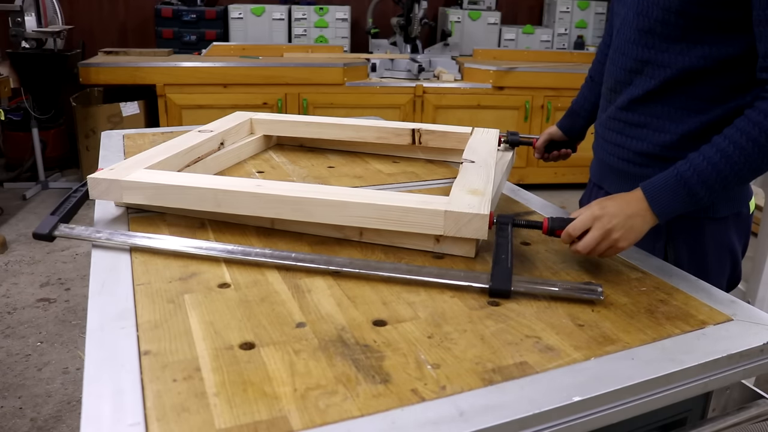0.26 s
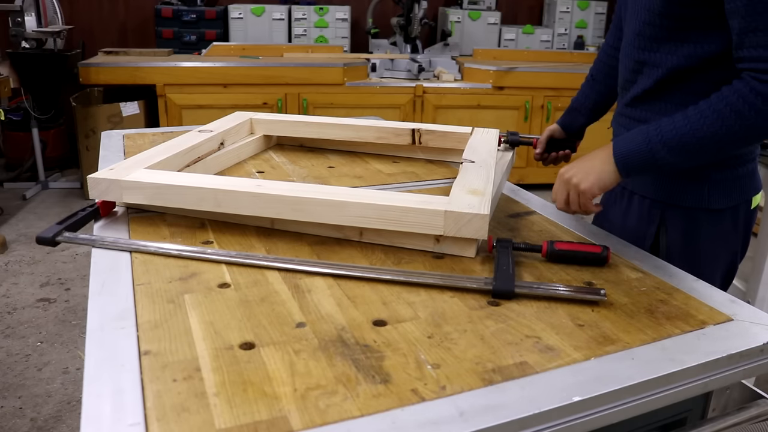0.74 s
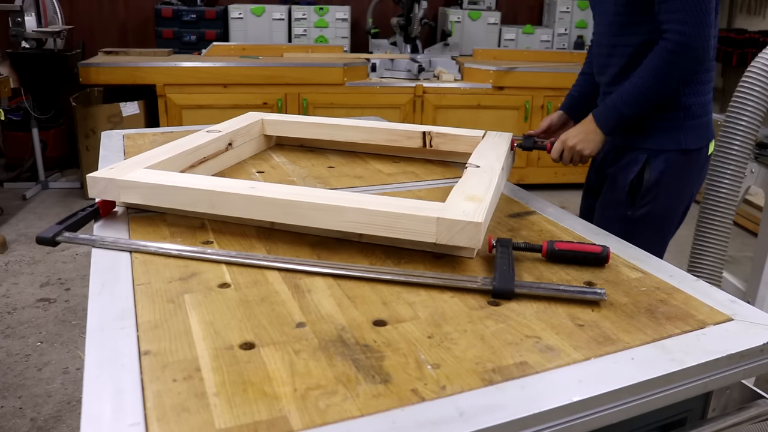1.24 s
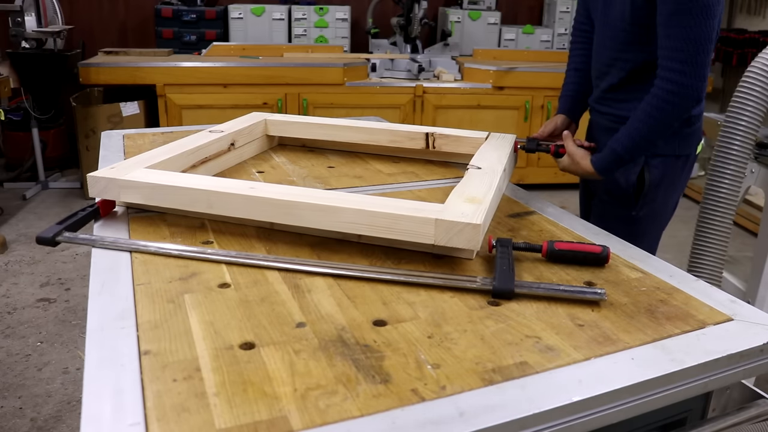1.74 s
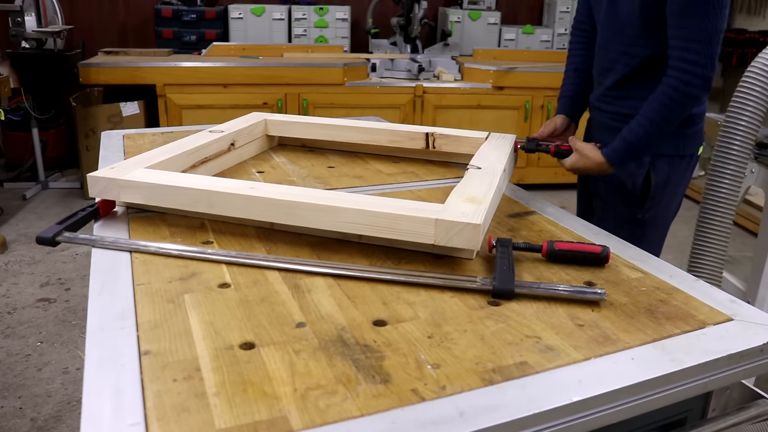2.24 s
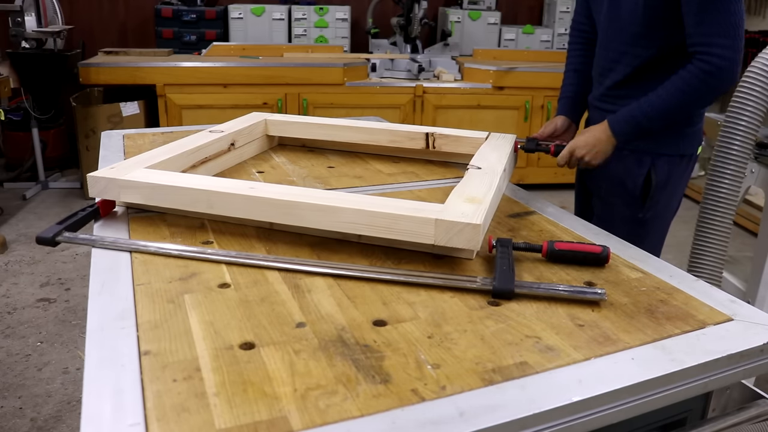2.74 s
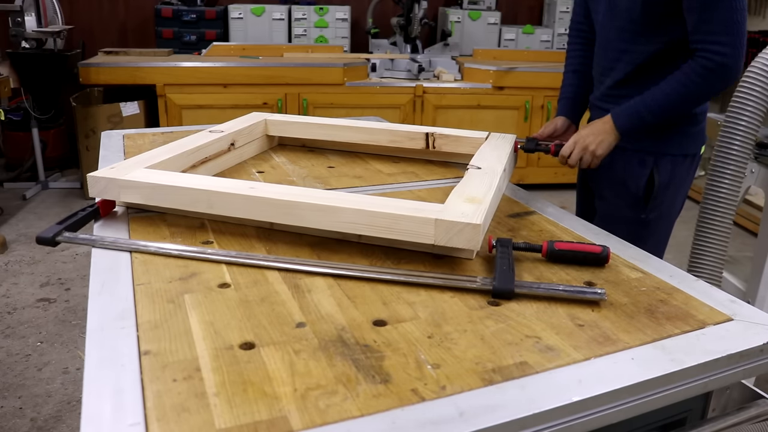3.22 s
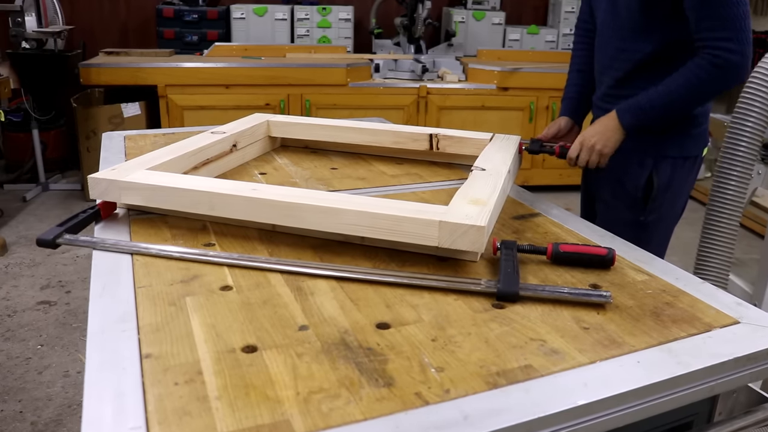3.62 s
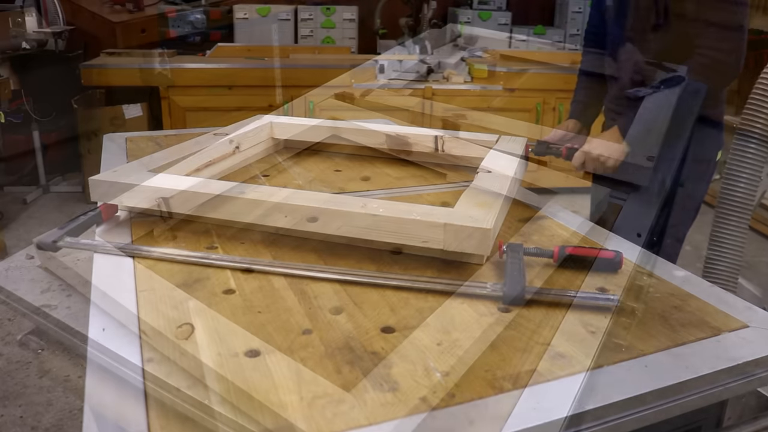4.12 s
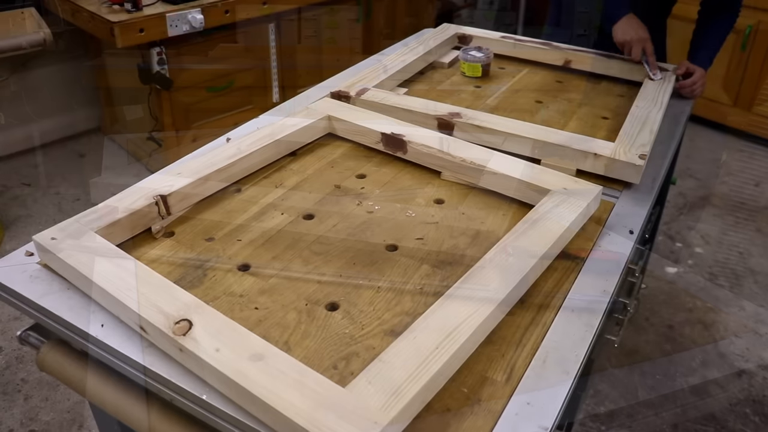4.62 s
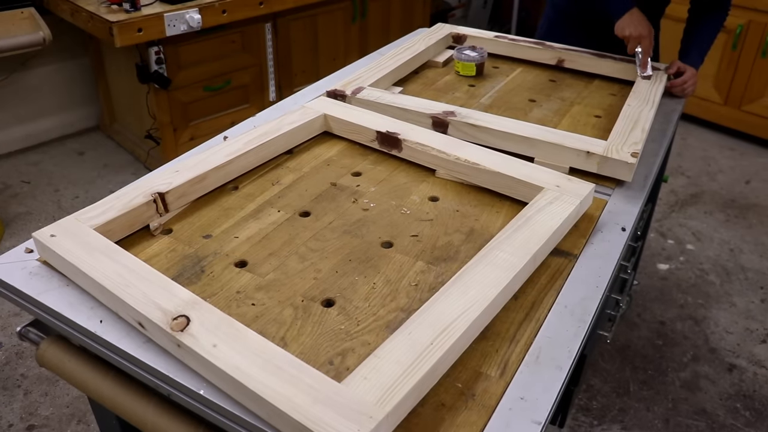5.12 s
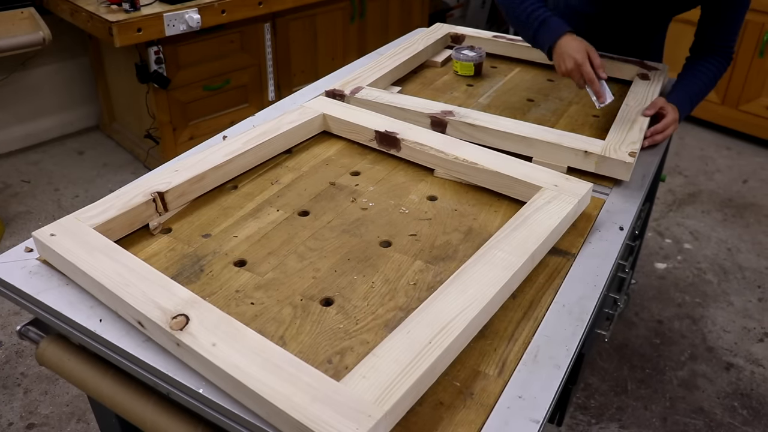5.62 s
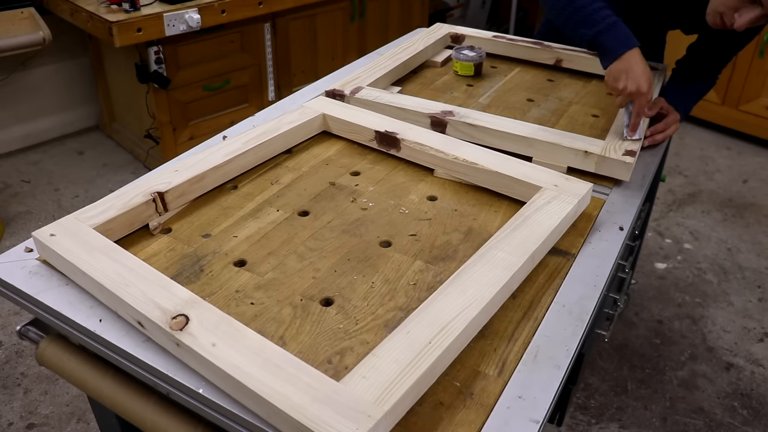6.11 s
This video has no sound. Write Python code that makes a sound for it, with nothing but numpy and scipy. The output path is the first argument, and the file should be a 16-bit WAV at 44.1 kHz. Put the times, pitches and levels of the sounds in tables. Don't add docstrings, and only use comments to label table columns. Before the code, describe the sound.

In a small workshop a steel clamp bar drops hard on a wooden bench, ringing brightly, turning over, scraping and being set down. Handle grips and soft thumps follow, then six wooden knocks about every 0.4 seconds, weakening at the end. The scene fades to faint rag wipes and fingertip taps on another frame. Close small microphone, low motor hum, overloaded on the first blow.

```python
import sys
import numpy as np
from scipy import signal
from scipy.fft import rfft, irfft
from scipy.io import wavfile

SR = 44100
rng = np.random.default_rng(int(sys.argv[2]) if len(sys.argv) > 2 else 0)


def digitize_waveform(pressure):
    field = np.atleast_2d(pressure).T
    bounded = np.clip(field, -1, 1)
    quanta = np.round(bounded * 32767).astype(np.int16)
    wavfile.write(sys.argv[1], SR, quanta)


def level_to_linear(level):
    exponent = np.asarray(level, float) / 20
    return 10 ** exponent


N = 280476

# [t/s, wood/dB, steel/dB, gain dip/dB, recovery/s]
BLOWS = [
    (0.3813, 10, 3, 30.5, 0.13),
    (0.662, -6, -11.5, 11, 0.53),
    (1.3147, -5, -30.5, 19, 0.062),
]
# [t/s, peak/dB, hardness/dB]
CLACKS = [
    (2.5024, -16, 4.5),
    (2.9426, -16, 4.5),
    (3.3762, -13, 2.5),
    (3.786, -18.5, 1.5),
    (4.203, -21, 4),
    (4.578, -27, 1.5),
]
# [t/s, peak/dB, hardness/dB]
TAPS = [
    (5.3012, -32, 3),
    (5.734, -48, -3),
    (5.838, -33.5, 1),
    (6.0428, -34.5, 12),
    (6.0492, -33, 13),
    (6.086, -30, -15),
    (6.2396, -33, 2),
]
# [f/Hz, width/Hz, level/dB]
BENCH = [(230.6, 26, -13), (378, 52, -11), (550, 67, -9.5), (802, 69, -12), (1129, 100, 6.5),
         (1352, 42, -2.5), (1545, 110, 11), (1674, 141, 14), (2193, 59, -0.5), (2510, 50, -5.5)]
# [f/Hz, level/dB, 60 dB decay/s]
FRAME = [(193.4, -1, 0.5), (214, 5, 0.24), (274, -19.5, 0.12), (283.6, -2.5, 0.485), (310, -1, 0.19),
         (362, -9.5, 0.28), (398.5, 0, 0.36), (451, -2.5, 0.37), (503, -5, 0.47), (624, -3.5, 0.22),
         (643.5, -2.5, 0.6), (737, 0, 0.34), (781, 5, 0.12), (856, -6.5, 0.2), (1004, -7.5, 0.22),
         (1154, -11, 0.56), (1247, -7.5, 0.15), (1310, -20, 0.088), (1497, -29.5, 0.13), (1650, -6, 0.49),
         (2120, -17, .15), (1613, -21.5, 0.72), (1785, -12.5, 0.16), (1863, 1.5, 0.14), (2280, -22.5, 0.17),
         (2520, -20, 0.12)]
BAR_HZ = [2575, 3553, 3806, 4705, 5076, 5276, 5566, 5631, 5945, 6435, 6760, 7700, 7763, 8815, 9728, 9851,
          9940, 10330, 10620, 11550, 12320, 12930, 14400, 14900, 3220, 4120, 7230, 8450, 9020, 9440, 11150,
          13300, 13700, 15600]
# [level at first blow/dB, level at later blows/dB, 60 dB decay/s]
BAR_RING = [(3.5, 3, 0.36), (-24, -13.5, .5), (-8, -21, .6), (-12, 0, 0.74), (-15.5, -20.5, 0.48),
            (-7, -23, 0.6), (-16.5, -19, .7), (-9, -18.5, 0.33), (-15.5, -16.5, .5), (-15.5, -10, .6),
            (-3, -8.5, 0.66), (-21.5, -8, 0.45), (-8, -16, .35), (-19, -15.5, .5), (-14, -4.5, .3),
            (-11.5, -10, .5), (-16, -8.5, 0.45), (-10.5, -12, 0.32), (-7.5, -11, .35), (-16, -12, .35),
            (-16, -15, .5), (-21, -17.5, .6), (-25.5, -12.5, .4), (-22.5, -26, .4), (-15.5, -20, .4),
            (-11, -10.5, .4), (-13, -17.5, .4), (-20, -15, .4), (-21.5, -9.5, .4), (-17, -16.5, .4),
            (-17.5, -12.5, .4), (-24.5, -22.5, .3), (-26, -25, .3), (-27, -19.5, .3)]
LUCK_DB = 3.9


def rms_one(x):
    return x / np.sqrt(np.mean(x ** 2) + 1e-20)


def in_time(rows):
    s, *columns = np.transpose(rows)
    return [np.interp(np.arange(N) / SR, s, c, left=-150, right=-150) for c in columns]


def band(x, low_hz, high_hz):
    sos = signal.butter(2, [low_hz, min(high_hz, .45 * SR)], "band", fs=SR, output="sos")
    return signal.sosfilt(sos, x + 1e-18)


def drift(rate):
    steps = rng.standard_normal(int(N / SR * rate) + 2)
    return np.interp(np.arange(N) / SR * rate, np.arange(len(steps)), steps)


def ring(clicks, hz, t60):
    r, w = level_to_linear(-60 / (t60 * SR)), 2 * np.pi * hz / SR
    return signal.lfilter([0, np.sin(w)], [1, -2 * r * np.cos(w), r * r], clicks + 1e-18)


def train(times, gains):
    clicks = np.zeros(N)
    clicks[np.round(np.asarray(times) * SR).astype(int)] = gains
    return clicks


def grains(per_s, spread_db):
    sizes = level_to_linear(spread_db * np.minimum(rng.exponential(1, N), 4)) * rng.choice([-1, 1], N)
    return rms_one(sizes * (rng.random(N) < per_s / SR))


def crack(clicks, t60):
    return signal.lfilter([1], [1, -level_to_linear(-60 / (t60 * SR))], clicks + 1e-18) * rng.standard_normal(N)


def strike(times, db, modes, shorten, longest, luck_db=LUCK_DB):
    strength_db = luck_db * rng.standard_normal((len(times), len(modes))) + db
    out = np.zeros(N)
    for k, (hz, mode_db, t60) in enumerate(modes):
        out += ring(train(times, level_to_linear(strength_db[:, k] + mode_db)), hz, min(shorten * t60, longest))
    return out


def fades():
    t = np.arange(N) / SR
    return np.interp(t, (3.1, 5.29), [1, 0]), np.interp(t, (3.57, 5.47), [0, 1])


def blows():
    s, wood_db, steel_db = np.transpose(BLOWS)[:3]
    wood = sum(ring(train(s, level_to_linear(wood_db + db - 12.5)), hz, 2.0 / width) for hz, width, db in BENCH)
    wood_snap = band(crack(train(s, level_to_linear(wood_db - 2.5)), 0.0021), 1300, 2300)
    steel_snap = band(crack(train(s, level_to_linear(steel_db - 1.5)), 0.027), 2600, 11000)
    first_db, later_db, t60s = np.transpose(BAR_RING)
    spot_db = np.array([first_db, later_db, later_db])
    modes = [(hz, 0, t60) for hz, t60 in zip(BAR_HZ, t60s)]
    steel = strike(s, steel_db[:, None] + spot_db - 21.0, modes, shorten=0.6, longest=.7, luck_db=1.0)
    return wood + wood_snap + steel_snap, steel


def drag():
    # [t/s, level/dB]
    slides = [
        [(0.31, -57.5), (0.358, -50.5), (0.374, -42), (0.381, -33.5)],
        [(0.39, -22.5), (0.417, -27.5), (0.533, -32.5), (0.62, -36.5), (0.653, -48), (0.6615, -40)],
        [(0.673, -30.5), (0.693, -39), (0.725, -31), (0.805, -29.5), (0.845, -33.5), (0.977, -53), (1.0, -54)],
        [(1.228, -57.5), (1.255, -40), (1.307, -35), (1.314, -33.5)],
        [(1.319, -27), (1.42, -33.5), (1.47, -43), (1.578, -63.5), (1.6, -68)],
    ]
    # [low wood/dB, steel/dB]
    colours = [
        (-0.5, 0),
        (-6.5, -5),
        (-4, -7.5),
        (-11, -4),
        (1, -19),
    ]
    levels = [in_time(rows)[0] + np.array([[low], [0], [steel]]) for rows, (low, steel) in zip(slides, colours)]
    low_db, high_db, steel_db = np.max(levels, axis=0)
    chatter = grains(6000, 1.6) * level_to_linear(.9 * np.clip(drift(70), -2, 1.2))

    def bench_part(part):
        rung = [level_to_linear(db) * np.sqrt(width) * ring(chatter, hz, 0.72 / width) for hz, width, db in part]
        return rms_one(sum((-1) ** k * tone for k, tone in enumerate(rung)))

    low, high = bench_part(BENCH[:4]), bench_part(BENCH[4:])
    turned = np.arange(N) > BLOWS[1][0] * SR
    steel = rms_one(sum(level_to_linear(np.where(turned, second, first)) * ring(chatter, hz, .15)
                        for hz, (first, second, _) in zip(BAR_HZ, BAR_RING)))
    grit = grains(9000, 2.9) * level_to_linear(0.49 * drift(91.7))
    bright = level_to_linear(-1) * band(steel, 4300, 15500)
    bright = bright + rms_one(band(band(grit, 2100, 9200), 1500, 10000))
    bright = bright + level_to_linear(-15.0) * rms_one(band(grit, 7300, 14000))
    return level_to_linear(low_db - 0.5) * low + level_to_linear(high_db - 3.0) * high + level_to_linear(steel_db - 6.0) * bright


def knock_rows():
    # [t/s, peak/dB, hardness/dB]
    bounces = [
        (.4928, -23, 8.5),
        (0.525, -22.5, 4.5),
        (0.6305, -21.5, -8.5),
        (0.644, -23, -0.5),
        (.705, -31.5, 10),
        (.723, -28, 11),
        (0.758, -21, 10.5),
        (0.785, -18.5, -7.5),
        (.798, -26.5, 6),
        (.822, -25.5, 1),
    ]
    # [t/s, peak/dB, hardness/dB]
    thumps = [(1.781, -26, -1), (1.844, -29.5, 5.5), (2.323, -31.5, 8), (2.676, -31.5, 1),
              (2.684, -37, -16), (2.755, -48, 14), (3.217, -29.5, -1), (3.231, -34, 1.5), (3.244, -41, 3),
              (3.355, -31.5, 0), (3.609, -39.5, 7.5), (3.635, -38.5, 0), (4.069, -37.5, -6),
              (4.406, -42.5, 3.5), (4.802, -46, 1)]
    # [t/s, peak/dB, hardness/dB]
    pads = [(0.105, -35.5, -1), (0.555, -17.5, 4), (0.6, -19, -7), (1.178, -20, 9.5), (2.348, -28, 9.5),
            (2.48, -28.5, 4), (2.783, -26, 10), (2.921, -30.5, -5), (4.178, -33, -3.5), (4.937, -44, 7),
            (5.147, -38.5, 11.5)]
    # [bass/dB, low wood/dB, high wood/dB, tick/dB]
    pad_shares = (-9.5, -20, -32.5, -24)
    kinds = [(bounces, (-10.5, -6.5, -1.5, -33.5)), (CLACKS, (-13, -7.5, -13, -25)),
             (thumps, (-10, -12, -17.5, -31)), (TAPS, (-45, -26, -31, -20)), (pads, pad_shares)]
    tilt = np.array([-0.45, 0, 1, 1])
    return [(s, db, *(shares + hard * tilt)) for rows, shares in kinds for s, db, hard in rows]


def knocks():
    # [f/Hz, level/dB, 60 dB decay/s]
    contact_modes = [(640, -9, .025), (1043, -10, 0.018), (1452, 0, 0.018), (1790, -3, 0.018),
                     (2330, -19.5, .016), (2814, -17.5, 0.013)]
    # [f/Hz, level/dB, 60 dB decay/s]
    tick_modes = [(2900, -3, .008), (3700, -4, .007), (4600, -8, .005), (5600, -14, .004),
                  (7200, -20, .004)]
    s, peak_db, *share_db = np.transpose(knock_rows())
    screw = np.isin(s, np.transpose(CLACKS)[0])
    s = s + .002
    bass_db, low_db, high_db, tick_db = (peak_db[:, None] + db[:, None] for db in share_db)
    luck_db = np.where(screw, 1.2, LUCK_DB)[:, None]
    hz = np.array(FRAME)[:, 0]
    region = (hz > 330).astype(int) + (hz > 900)
    wood_db = np.choose(region, [bass_db - 3.5, low_db - 9.5, high_db - 10.5])
    wood = strike(s + 0.002986, wood_db, FRAME, shorten=0.49, longest=0.35, luck_db=luck_db)
    wood = wood + strike(s + .016, low_db - 9, FRAME[2:11], shorten=0.24, longest=.2, luck_db=luck_db)
    thud = band(band(crack(train(s + 0.00052, level_to_linear(low_db[:, 0] + 11.5)), 0.077), 290, 926), 250, 2300)
    contact = strike(s + 0.001634, high_db + 5.0, contact_modes, shorten=0.95, longest=1, luck_db=luck_db)
    touch_db = high_db[:, 0] + 3.5 - 10 * ~screw
    contact = contact + ring(train(s, level_to_linear(touch_db)), 1960, 0.009)
    tick = strike(s, tick_db - 2.5, tick_modes, shorten=0.44, longest=1, luck_db=luck_db)
    tick = tick + level_to_linear(-19.5) * np.roll(tick, round(0.0006 * SR))
    tick = tick + band(crack(train(s, level_to_linear(high_db[:, 0] - 9)), 0.028), 3400, 5500)
    return band(wood, 170, 2800) + band(contact, 660, 3300) + thud + band(tick, 940, 12000)


def ticks():
    # [t/s, peak/dB, centre f/Hz]
    contacts = [(0.3165, -38.5, 4660), (0.544, -11.5, 5800), (0.729, -10, 6740), (0.9975, -27.5, 4800),
                (1.1078, -31, 3400), (1.6878, -38, 3950), (2.2212, -34, 7000), (2.8399, -30, 3600),
                (3.01, -34, 3670), (3.0704, -35, 10100), (3.4504, -37, 3900), (3.723, -40, 3100),
                (3.906, -43.5, 12200), (4.219, -36.5, 7700), (4.6804, -36, 3770), (4.678, -40.5, 12000),
                (4.07, -42.5, 12000), (5.302, -43, 9000), (4.7913, -55, 12040), (4.922, -53, 13000),
                (4.958, -43.5, 7100), (4.9934, -45.5, 3100), (5.0816, -49, 7130), (5.2009, -42, 4020),
                (5.434, -46, 12400), (5.602, -54, 3620), (5.739, -58, 3725)]
    out = np.zeros(N)
    fade = level_to_linear(-60 * np.arange(4000) / SR / 0.028)
    fade = fade + level_to_linear(0.5) * fade ** 8
    for s, db, hz in contacts:
        burst = band(rng.standard_normal(4000) * fade, hz / 3.1, min(hz * 1.33, 15500))
        out[round(s * SR):][:4000] += level_to_linear(db - 6.0) * burst
    return out


def clinks():
    times = [2.755, 4.678, .3815, .3815, .3815, 1.3145, .544, .6692, .6692, .6692, .544, .7292, .729, .729,
             2.481, 2.922, 3.357, 1.686, 3.611, 3.635, 6.0452, 6.241, 6.241]
    # [peak/dB, centre f/Hz, span/octaves]
    colours = [(-37, 1970, 1.1), (-38, 2900, 0.47), (11, 1800, 0.22), (10, 2250, 0.24), (5, 830, 0.15),
               (9.5, 820, 0.65), (-11.5, 5950, 0.21), (-1.5, 1800, 0.37), (-7, 9900, 0.31),
               (-11.5, 6700, 1.1), (-17, 9400, 0.32), (-8, 5700, 0.3), (-10, 7600, .5), (-16, 11500, .4),
               (-31, 1700, 0.3), (-34, 1570, .35), (-41, 1500, 0.31), (-40, 12300, .2), (-34.5, 1950, 0.55),
               (-34, 2450, 0.54), (-42, 3400, 3.7), (-36, 4500, .5), (-35, 1980, 0.32)]
    out = np.zeros(N)
    for s, (db, hz, span) in zip(times, colours):
        edge = 2 ** (span / 2)
        out += band(crack(train([s], level_to_linear(db)), 0.019), hz / edge, hz * edge)
    return out


def streaks():
    # [t/s, length/s, first f/Hz, last f/Hz]
    glides = [(1.23, .085, 2580, 2520), (1.25, .09, 1750, 1660), (1.25, .064, 2150, 2200),
              (1.25, .09, 1150, 880), (1.283, .05, 735, 705), (1.325, .12, 720, 520),
              (1.33, .14, 1700, 1520), (2.753, .05, 1800, 1700), (3.218, .07, 640, 630),
              (3.222, .03, 1660, 1640), (.755, .085, 1080, 1020), (.47, .09, 1700, 1760),
              (.51, .1, 2300, 2260), (.715, .05, 1520, 1540), (.098, .015, 1720, 1700),
              (.122, .018, 1680, 1700), (.161, .012, 1700, 1620), (.178, .016, 2550, 2530),
              (.142, .014, 2560, 2550), (.17, .07, 600, 540), (.632, .025, 1500, 1350),
              (4.07, .04, 2600, 2580), (.68, .2, 14400, 14400), (.4, .24, 7770, 7765)]
    levels_db = [-52.5, -46, -49, -42.5, -35, -36.5, -45, -53, -51, -52, -31.5, -37, -36.5, -39, -50, -50.5,
                 -45, -50.5, -52.5, -51, -33, -55, -63.5, -52]
    out = np.zeros(N)
    waver = drift(110) + 1j * drift(110) + 0.56
    for (s, length, first_hz, last_hz), db in zip(glides, levels_db):
        start, phase = round(s * SR), np.arange(round(length * SR)) / (length * SR)
        here = slice(start, start + len(phase))
        tone = np.exp(2j * np.pi * np.cumsum(first_hz + (last_hz - first_hz) * phase) / SR)
        swell = np.clip(np.minimum(phase / 0.18, (1 - phase) / 0.36), 0, 1)
        out[here] += level_to_linear(db) * swell * np.real(tone * np.roll(waver, first_hz)[here])
    return out


def jolts():
    s, wood_db = np.transpose(BLOWS)[:2]
    turn_s, turn_db = np.transpose(CLACKS)[:2]
    sway = band(crack(train(turn_s, level_to_linear(turn_db - 17)), 0.63), 14, 32)
    return ring(train(s, level_to_linear(wood_db - 44.5)), 45, 0.03) + sway


def stroke_rows():
    # [t/s, length/s, level/dB]
    palms = [(0.085, 0.12, -72), (1.705, 0.029, -54.5), (1.827, 0.16, -50.5), (2.307, 0.08, -51),
             (2.622, 0.057, -56), (2.764, 0.14, -56.5), (3.202, 0.069, -50.5), (3.595, 0.11, -58),
             (4.058, 0.068, -49.5), (4.391, 0.073, -61.5), (4.674, 0.048, -56.5)]
    # [t/s, length/s, centre f/Hz, level/dB]
    flicks = [(0.977, 0.14, 5300, -55.5), (1.107, 0.17, 5800, -57), (1.14, 0.11, 9500, -51),
              (1.672, 0.13, 7060, -59), (2.25, 0.12, 7300, -51), (2.386, 0.084, 4500, -56),
              (2.78, 0.29, 6740, -57), (2.86, 0.19, 7300, -58.5), (3.23, 0.34, 6500, -61.5),
              (3.718, 0.078, 5860, -62.5), (3.895, 0.11, 8900, -61), (4.08, 0.043, 7900, -63.5),
              (4.227, 0.084, 10800, -61), (4.427, 0.11, 12100, -66), (4.674, 0.15, 6050, -70),
              (4.79, 0.046, 11800, -63), (4.99, 0.063, 10000, -63), (5.3, 0.05, 970, -58.5),
              (5.075, 0.081, 1150, -69.5), (5.432, 0.11, 10000, -57), (5.592, 0.029, 2800, -61),
              (6.236, 0.042, 2320, -57), (5.892, 0.16, 3800, -64), (6.06, 0.13, 3700, -66),
              (6.267, 0.043, 4400, -55.5), (1.51, 0.14, 5700, -55), (0.32, .06, 1400, -59.5),
              (4.005, .04, 1700, -57.5), (4.21, 0.065, 3300, -52.5), (1.84, 0.096, 2640, -64.5),
              (4.442, .09, 3900, -68.5), (1.865, 0.064, 790, -48), (2.32, .05, 1800, -55),
              (3.5, 0.033, 770, -49.5), (2.1, 0.13, 2400, -70), (1, 0.054, 4200, -51.5),
              (.4, .2, 2800, -41.5)]
    # [t/s, length/s, centre f/Hz, level/dB]
    creaks = [
        (0.105, 0.12, 2610, -71),
        (1.83, 0.15, 2540, -65),
        (2.34, 0.068, 2800, -68),
        (2.753, .06, 2640, -57),
        (3.22, 0.13, 2660, -58),
        (3.612, .07, 2560, -61),
        (4.063, 0.12, 2670, -63),
        (4.392, 0.098, 2750, -67),
    ]
    # [t/s, length/s, centre f/Hz, span/octaves, level/dB]
    hisses = [
        (0.002, 0.34, 7900, 0.5, -59.5),
        (1.354, 0.4, 9000, 0.22, -58.5),
        (1.36, 0.44, 10550, .1, -64),
        (1.237, .08, 7150, .2, -48.5),
        (2.2, 0.2, 9800, 0.17, -75),
        (3.25, 0.19, 10300, .12, -84),
    ]
    # [t/s, length/s, wood/dB, cloth/dB]
    wipes = [
        (5.145, 0.1, -67.5, -60.5),
        (5.316, 0.077, -63.5, -58.5),
        (5.878, 0.13, -57, -59),
        (6.056, 0.14, -57.5, -59.5),
        (6.178, 0.053, -81, -60.5),
        (6.238, 0.082, -63.5, -52),
    ]
    quick, slow, broad = 0.11, 0.38, 2.9
    return ([(s, n, quick, 1350, broad, db) for s, n, db in palms]
            + [(s, n, quick, hz, 1.35, db) for s, n, hz, db in flicks]
            + [(s, n, quick, hz, .45, db) for s, n, hz, db in creaks]
            + [(s, n, slow, hz, span, db) for s, n, hz, span, db in hisses]
            + [(s, n, slow, 1900, broad, db) for s, n, db, _ in wipes]
            + [(s, n, slow, 9400, 0.93, db) for s, n, _, db in wipes])


def strokes():
    out = np.zeros(N)
    friction = grains(7000, 1.5) * level_to_linear(2.0 * drift(70))
    for s, length, share, hz, octaves, db in stroke_rows():
        start, phase = round(s * SR), np.arange(round(length * SR)) / (length * SR)
        rise_and_fall = np.minimum(phase / share, (1 - phase) / (1 - share)).clip(0, 1)
        swell = np.sin(np.pi / 2 * rise_and_fall) ** 2
        edge = 2 ** (octaves / 2)
        rub = friction[start:start + len(phase)]
        rub = band(band(rub, hz / edge, hz * edge), hz / edge, hz * edge)
        out[start:start + len(phase)] += level_to_linear(db) * rms_one(rub) * swell
    wood = sum(level_to_linear(db) * ring(out, hz, 0.058) for hz, db, _ in FRAME)
    return out + fades()[0] * level_to_linear(-39.5) * wood


def second_frame(rubs):
    # [f/Hz, level/dB, 60 dB decay/s]
    modes = [(437, -20, 0.057), (513, -1, 0.1), (716, -0.5, 0.044), (1280, -0.5, 0.041),
             (1900, -7.5, 0.052), (2170, 2, 0.024), (2954, -1.5, 0.027), (3790, -5, 0.051),
             (4380, -1.5, 0.029), (5000, -13, 0.013)]
    s, db = np.transpose(TAPS)[:2]
    touches = train(s + 0.00221, level_to_linear(db - 23)) + level_to_linear(-30.0) * fades()[1] * rubs
    return sum(level_to_linear(mode_db) * ring(touches, hz, t60) for hz, mode_db, t60 in modes)


def hands():
    # [t/s, level/dB]
    effort = [(0, -56), (.15, -39.5), (.3, -50), (1.09, -53), (1.23, -42.5), (1.5, -48.5), (2.15, -58.5),
              (2.38, -45.5), (2.6, -55.5), (2.69, -66), (2.9, -44), (3.3, -55), (3.45, -52), (3.64, -54),
              (4.25, -52.5), (4.75, -61), (5.4, -69.5), (6.36, -71)]
    handling_db, = in_time(effort)
    first, second = fades()
    sleeve_db = -64.5 + 0.58 * (handling_db - handling_db.mean())
    cloth = first * level_to_linear(sleeve_db) + second * level_to_linear(-67)
    touch = grains(3800, 2.7)
    wood = rms_one(sum(level_to_linear(.5 * db) * ring(touch, hz, 0.26) for hz, db, _ in FRAME))
    wood = wood + level_to_linear(3.0) * rms_one(band(touch, 150, 1900))
    rustle = rms_one(band(grains(12000, 1.7), 1600, 10000)) * level_to_linear(2.0 * drift(6.9))
    return level_to_linear(handling_db - 14.0) * wood + level_to_linear(-4.5) * cloth * rustle


def workshop(x):
    # [f/Hz, 60 dB decay/s]
    room = [(150, 0.36), (400, 0.33), (1200, 0.36), (3000, 0.35), (7000, 0.3), (14000, 0.16)]
    t = np.arange(SR // 2) / SR
    tail = sum(band(rng.standard_normal(len(t)), hz / 1.67, hz * 2.13) * level_to_linear(-60 * t / t60) for hz, t60 in room)
    tail = tail * np.clip((t - .003) / 0.0011, 0, 1)
    return signal.fftconvolve(x, tail / np.sqrt(np.sum(tail ** 2)))[:N]


def motors():
    hum_hz = [93.5, 171.2]
    t = np.arange(N) / SR
    out = np.zeros(N)
    for fade, db, hz in zip(fades(), (-62.5, -71), hum_hz):
        level = np.sqrt(2) * fade * level_to_linear(db + 0.51 * drift(4.3))
        out += level * np.sin(2 * np.pi * hz * t + 0.32 * drift(11.0))
    rumble = rms_one(band(rng.standard_normal(N), 40, 150))
    return out + (fades()[0] * level_to_linear(-73.5) + level_to_linear(-91)) * rumble


def coloured(spectrum):
    hz, db = np.transpose(spectrum)
    grid = np.arange(N // 2 + 1) * SR / N + 1
    shape = level_to_linear(np.interp(np.log(grid), np.log(hz), db, left=-80, right=-80))
    return rms_one(irfft(rfft(rng.standard_normal(N)) * shape, N))


def air():
    # [f/Hz, level per Hz/dB]
    first_air = [(76, -31), (130, -5), (211, 2.5), (522, -12), (601, -9.5), (780, -14), (1710, -12),
                 (3130, -22.5), (3530, -32.5), (6470, -26), (16000, -33)]
    # [f/Hz, level per Hz/dB]
    second_air = [(140, -56.5), (230, -14.5), (1430, -13.5), (1510, -21), (2080, -15.5), (3420, -6),
                  (5920, -17), (7200, -12), (7870, -29), (12900, -14.5), (16000, -28)]
    first, second = fades()
    return first * level_to_linear(-61) * coloured(first_air) + second * level_to_linear(-67) * coloured(second_air)


def recorder_gain():
    lags = [0.005, 0.0076, 0.0032]
    t = np.arange(N) / SR
    gain_db = np.zeros(N)
    for (s, _, _, dip, back), lag in zip(BLOWS, lags):
        drop = np.clip((t - s - lag) / 0.005, 0, 1)
        gain_db -= dip * drop * np.exp(-(np.maximum(t - s, 0) / back) ** 2)
    return level_to_linear(gain_db)


def scene():
    wood, steel = blows()
    hits, rubs = wood + knocks() + ticks() + clinks(), strokes()
    heard = drag() + streaks() + hands() + rubs + second_frame(rubs) + level_to_linear(-8.5) * workshop(rubs)
    near = hits + level_to_linear(-2.5) * workshop(hits) + steel + heard / recorder_gain()
    low_cut = signal.butter(4, 192.5, "high", fs=SR, output="sos")
    picked_up = signal.sosfilt(low_cut, near) + level_to_linear(-19.0) * band(near, 50, 320)
    return (picked_up + jolts() + motors() + air())[None]


def low_pass(x):
    return signal.sosfilt(signal.butter(12, 16630, fs=SR, output="sos"), x)


def record(dry):
    clip_top = .28
    hissing = dry + level_to_linear(-74) * band(rng.standard_normal(N), 2000, 18000)
    level = hissing * recorder_gain() / clip_top
    limited = clip_top * level / (1 + level ** 6) ** (1 / 6)
    steep = signal.cheby2(12, 45, 16150, fs=SR, output="sos")
    return low_pass(signal.sosfilt(steep, limited))


dry = scene()
out = record(dry)
digitize_waveform(out)
```